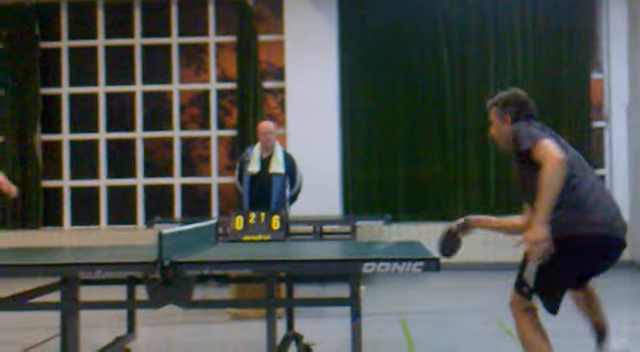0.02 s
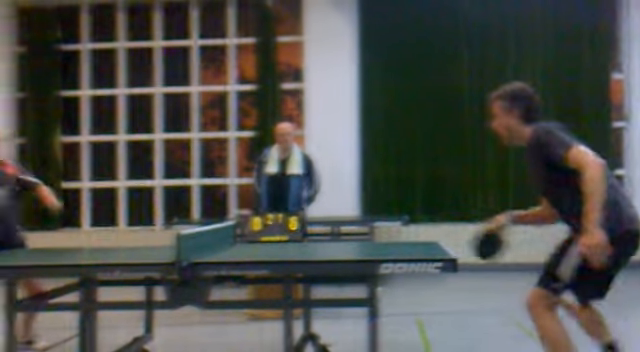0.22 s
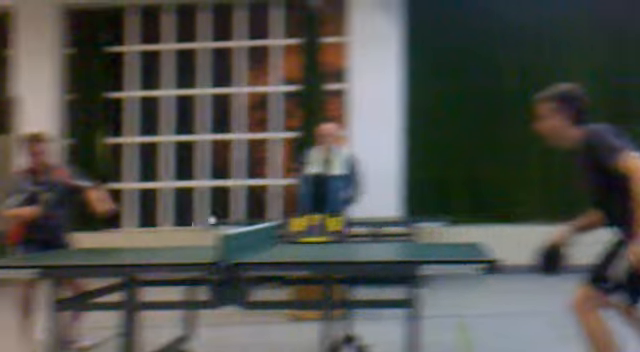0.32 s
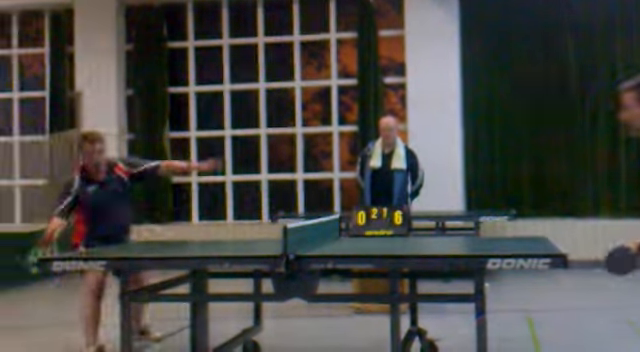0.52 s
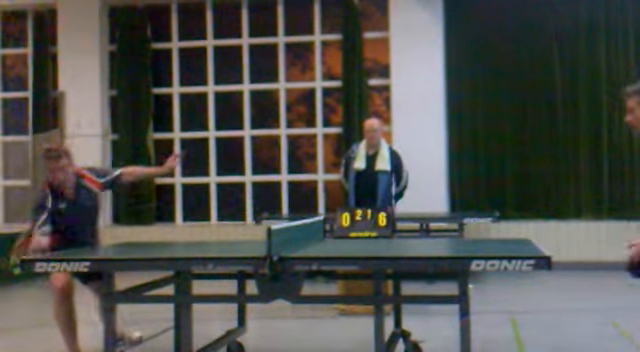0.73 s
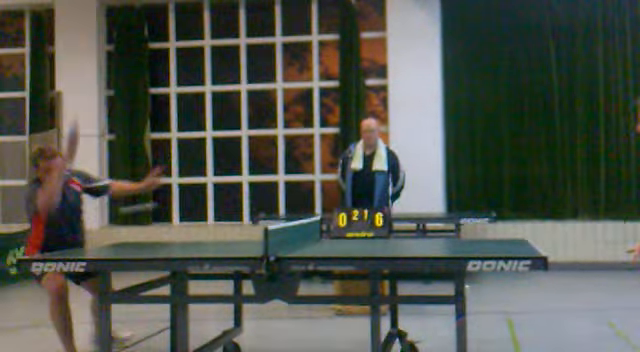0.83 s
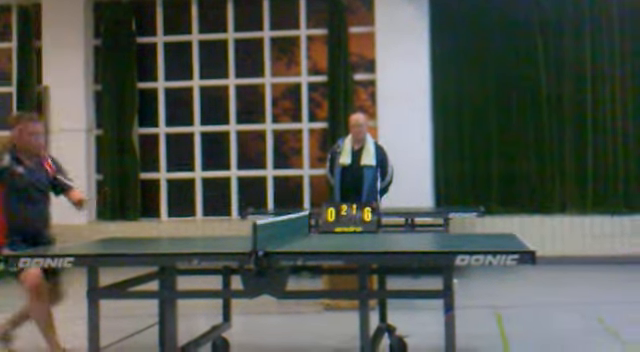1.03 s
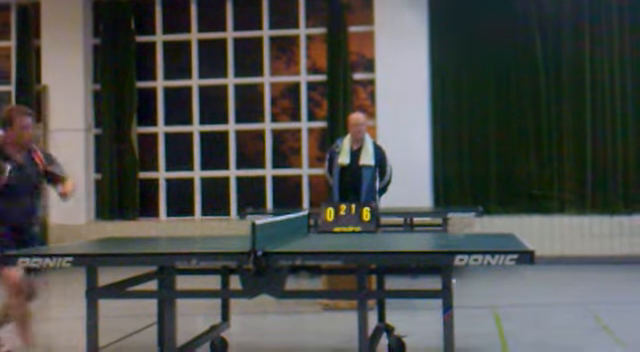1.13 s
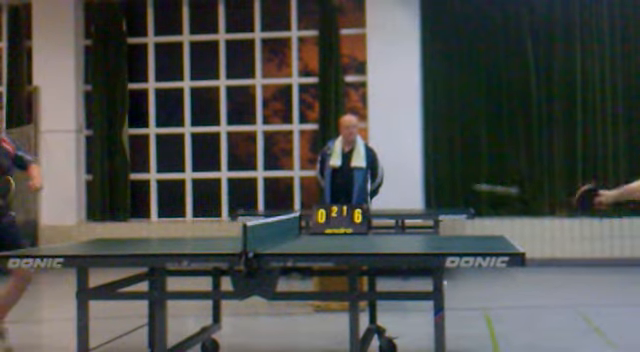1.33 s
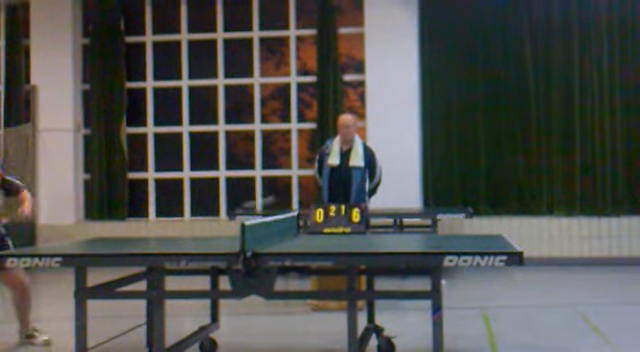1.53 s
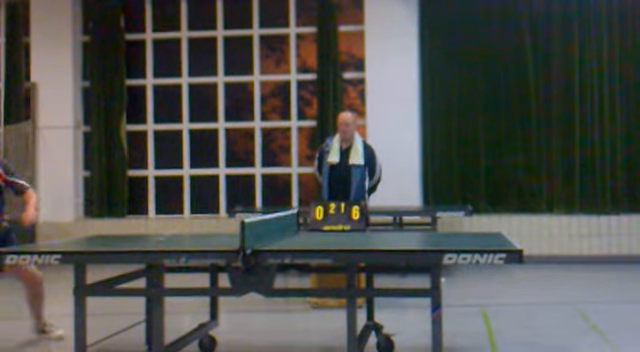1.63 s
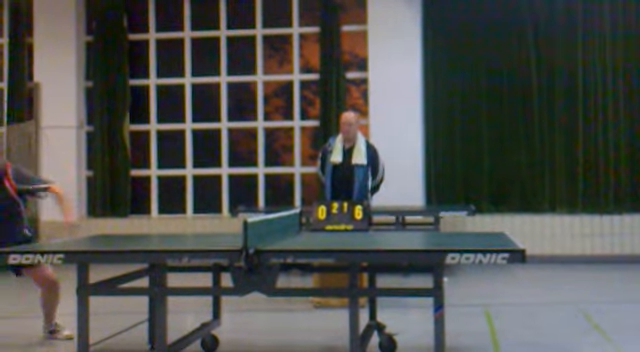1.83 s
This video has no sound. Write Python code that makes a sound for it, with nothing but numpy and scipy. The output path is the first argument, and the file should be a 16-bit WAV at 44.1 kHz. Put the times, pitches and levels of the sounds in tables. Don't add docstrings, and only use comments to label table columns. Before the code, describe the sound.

A massive foot stamp on sprung floorboards dominates at 0.24 s, deep and clipping the microphone, with a shoe squeak at 0.26. Just before, a dull bat knock at 0.08 and table click at 0.2. Softer table bounces follow at 0.6, 1.26 and 1.8, bat hits at 0.9 and 1.42, a higher squeak at 1.5, and quick footfalls from 1.4 onward. The hall rings over faint ventilation.

```python
import sys
import numpy as np
from scipy import signal
from scipy.fft import rfft, irfft, next_fast_len
from scipy.io import wavfile
from scipy.ndimage import map_coordinates

SR = 44100
rng = np.random.default_rng(int(sys.argv[2]) if len(sys.argv) > 2 else 0)


def output_pcm(signal):
    pcm = np.clip(np.atleast_2d(signal).T, -1, 1) * 32767
    wavfile.write(sys.argv[1], SR, np.round(pcm).astype(np.int16))


def field_ratio(decibels):
    return 10 ** (np.asarray(decibels, dtype=float) / 20)


N = 81585


def unit(x):
    return x / np.sqrt(np.mean(x ** 2) + 1e-20)


def along(points, hz):
    point_hz, value = np.transpose(points)
    return np.interp(np.log(hz + 1), np.log(point_hz + 1), value)


def wobble(rate, size):
    knots = rng.standard_normal(int(size * rate / SR) + 4)
    return map_coordinates(knots, [np.arange(size) * rate / SR])


def filtered(x, response):
    m = next_fast_len(len(x) + 8192)
    return irfft(rfft(x, m) * response(np.fft.rfftfreq(m, 1 / SR)), m)[:len(x)]


def resonant(x, peaks):
    def response(f):
        total = 0
        for k, (center, width, db) in enumerate(peaks):
            damping = 1j * f * width
            total = total + (-1) ** k * field_ratio(db) * damping / (center * center - f * f + damping)
        return total
    return filtered(x, response)


def add(track, s, x):
    at = round(s * SR)
    track[at:at + len(x)] += x[:N - at]


# pitch in Hz, time to fall by 60 dB in seconds.
HALL_RING = [(100, 0.77), (500, 0.75), (1500, 0.67), (3600, 0.59), (7000, 0.51), (12000, 0.31)]
HALL_LEVEL = {"ball": 2.5, "shell": -4, "bat": 0.5, "step": 0.5, "squeak": -2.5, "boom": -10}


def hall(x, source):
    gap_s, late_db, late_slower = 0.0071, -26, 2.56
    hz, t, noise = signal.stft(rng.standard_normal(SR), SR, nperseg=256)
    fall_db = -60 * t / along(HALL_RING, hz)[:, None]
    fade = np.hypot(field_ratio(fall_db), field_ratio(late_db + fall_db / late_slower))
    tail = signal.istft(noise * fade, SR, nperseg=256)[1]
    delayed = np.pad(x, (round(gap_s * SR), 0))
    out = field_ratio(HALL_LEVEL[source]) * signal.fftconvolve(delayed, tail / np.linalg.norm(tail))
    return out + np.pad(x, (0, len(out) - len(x)))


def tick(t60, peaks):
    t = np.arange(SR // 10) / SR
    burst = field_ratio(-60 * t / t60) * rng.standard_normal(len(t))
    x = resonant(resonant(burst, peaks), peaks)
    return x / np.linalg.norm(x) * np.sqrt(SR / 2000)


# start in seconds, boom level in dB, slap level in dB, pitch factor.
LANDINGS = [(.229, -11, -14.5, 1.5), (.243, 0, -27.5, .97), (0.091, -53, -70, 0.65),
            (0.631, -28.5, -38.5, 1), (0.798, -36, -74, 0.68), (.925, -40.5, -52, 1.4),
            (1.041, -40, -84, 0.66), (1.15, -37, -47, 0.934), (1.216, -25.5, -77, 0.457),
            (1.427, -33, -31.5, 1.2), (1.447, -21, -41, 1), (1.546, -25.5, -31.5, 0.84),
            (1.618, -28, -38, 0.71), (1.69, -28, -44.5, 0.92), (1.718, -34.5, -70, 0.486),
            (1.801, -30.5, -39.5, 0.67)]
# pitch in Hz, level in dB, time to fall by 60 dB in seconds.
FLOORBOARDS = [(50, -6, 0.23), (77.64, -10.5, 0.46), (110, -19.5, 0.47), (139.7, -13.5, 0.17),
               (166.4, -9, 0.4), (244, -26, 0.067), (279.6, -1, 0.05), (350, -24.5, 0.16)]
# pitch in Hz, level in dB per Hz.
SOLE_SLAP = [(150, -7), (350, 0), (650, -6.5), (1500, -9), (2500, -11), (3500, -13.5), (7000, -22.5),
             (15000, -50)]


def landings():
    heave_start_hz, heave_end_hz, heave_sag_s = 172.8, 83.56, 0.0299
    heave_t60_s, heave_rise_s = 0.33, 0.0038
    boom_rise_s, slap_t60_s = 0.0021, 0.068
    out, t = np.zeros(N), np.arange(SR // 2) / SR
    for s, boom_db, slap_db, pitch in LANDINGS:
        boards = 0
        for hz, db, t60 in FLOORBOARDS:
            boards = boards + field_ratio(db - 60 * t / t60) * np.sin(2 * np.pi * hz * pitch * t)
        sag = (heave_start_hz - heave_end_hz) * heave_sag_s * (1 - np.exp(-t / heave_sag_s))
        cycles = pitch * (heave_end_hz * t + sag)
        heave = field_ratio(-60 * t / heave_t60_s) * np.sin(2 * np.pi * cycles)
        heave = heave * (1 - np.exp(-t / heave_rise_s))
        boom = boards * (1 - np.exp(-t / boom_rise_s)) - heave
        boom = boom * np.cos(np.pi * t)
        slap = unit(filtered(rng.standard_normal(len(t)), lambda hz: field_ratio(along(SOLE_SLAP, hz))))
        slap = slap * field_ratio(-60 * t / slap_t60_s)
        add(out, s, hall(field_ratio(boom_db) * boom, "boom") + hall(field_ratio(slap_db) * slap, "step"))
    return out


# start in seconds, length in seconds, level in dB, slip rate in Hz, wander in Hz.
SQUEAK_TIMES = [
    (0.263, 0.0732, -12, 3597, 110),
    (1.498, 0.0648, -16, 4540, 63.4),
]
# level in dB at the start, middle and end.
SQUEAK_SWELL = [(5, 2.5, 0), (-16.5, 0, 1)]
# levels in dB of overtones 2, 3 and 4.
FIRST_OVERTONES = (-20.5, -30, -39)
# levels in dB of overtones 2, 3 and 4.
SECOND_OVERTONES = (-30, -50, -60)
# pitch in Hz, level in dB.
HIGH_RIB = [(6000, -22.5), (5930, -13)]
# wander knots a second, rasp level in dB, rasp width in Hz, rib split in Hz.
SQUEAK_ROUGHNESS = [(450, -12, 950, 130), (350, -19, 1500, 225)]


def squeaks():
    chirp, chirp_s = 0.06, 0.0036
    mixing = field_ratio(-32)
    out, t = np.zeros(N), np.arange(SR // 8) / SR
    overtones = (FIRST_OVERTONES, SECOND_OVERTONES)
    rows = zip(SQUEAK_TIMES, SQUEAK_SWELL, overtones, HIGH_RIB, SQUEAK_ROUGHNESS)
    for times, swell_db, over_db, (high_hz, high_db), roughness in rows:
        s, length, db, hz, wander_hz = times
        knots, rasp_db, rasp_hz, split_hz = roughness
        high_turn = 2 * np.pi * np.cumsum(high_hz + 90 * wobble(250, len(t))) / SR
        high = np.sin(high_turn) + mixing * np.sin(2 * high_turn)
        rasp_peak = [(hz, rasp_hz, 0)]
        rasp = unit(resonant(resonant(rng.standard_normal(len(t)), rasp_peak), rasp_peak))
        tone = field_ratio(rasp_db) * rasp
        for side in (-.5, .5):
            rate = (hz + side * split_hz) * (1 + chirp * np.exp(-t / chirp_s))
            rate = rate + wander_hz * wobble(knots, len(t))
            turn = 2 * np.pi * np.cumsum(rate) / SR
            tone = tone + np.sin(turn)
            for k, overtone_db in enumerate(over_db):
                tone = tone + field_ratio(overtone_db) * np.sin((k + 2) * turn)
            high = high + mixing * np.sin(turn + high_turn)
        edge = np.clip(t / 0.0061, 0, 1) * np.clip((length - t) / .006 + 1, 0, 1)
        swell = np.interp(t, [0, length / 2, length], swell_db)
        grip = field_ratio(swell + 3.4 * wobble(128, len(t)))
        high_grip = field_ratio(high_db + 1.5 * wobble(120, len(t)))
        add(out, s, field_ratio(db) * hall(edge * (grip * tone + high_grip * high), "squeak"))
    return out


# start in seconds, level in dB, pitch in Hz.
SOLE_SCUFFS = [(.740, -45, 4840), (.88, -46, 4496), (.92, -53.5, 5870), (.935, -30, 361),
               (.945, -40.5, 800), (1.011, -45, 2240), (1.025, -57.5, 8000), (1.150, -43.5, 5000),
               (1.309, -31, 1850), (0.068, -47, 5020), (1.431, -37, 9400), (1.46, -32.5, 4800)]


def scuffs():
    out = np.zeros(N)
    for s, db, hz in SOLE_SCUFFS:
        add(out, s, field_ratio(db) * hall(tick(0.0094, [(hz, 0.48 * hz, 0)]), "step"))
    return out


# delay in seconds, level in dB.
NEAR_ECHOES = [(.0097, 1), (.018, -8), (.0315, -4), (.050, -9)]


def echoed(t60, peaks):
    out = np.zeros(SR // 5)
    for s, db in [(0.0039, -1.5)] + NEAR_ECHOES:
        add(out, s, field_ratio(db) * tick(t60, peaks))
    return out


# start in seconds, level in dB, shell brightness in dB.
TABLE_BOUNCES = [
    (0.198, -28.5, -11),
    (.6130, -32, -10),
    (.9020, -49.5, -5.5),
    (1.2583, -29, -3),
    (1.7984, -27, -13),
]
# pitch in Hz, width in Hz, level in dB.
TABLE_TOP = [(800, 1500, -5), (1395, 1300, 2), (1920, 580, -0.5), (3580, 610, -12)]
# pitch in Hz, width in Hz, level in dB.
BALL_SHELL = [(4260, 430, 2), (5700, 660, -0.5), (7190, 1100, -4.5), (8840, 200, 5), (10300, 1130, -1.5),
              (12850, 1300, -2.5)]


def table_bounces():
    top_lag_s = .005
    out = np.zeros(N)
    for s, db, shell_db in TABLE_BOUNCES:
        add(out, s, field_ratio(db + shell_db) * hall(echoed(0.0053, BALL_SHELL), "shell"))
        add(out, s + top_lag_s, field_ratio(db) * hall(echoed(0.0069, TABLE_TOP), "ball"))
    return out


# start in seconds, level in dB, blade pitch in Hz, shell in dB.
BAT_STROKES = [
    (.067, -49, 1140, -11),
    (0.084, -32, 946, -28),
    (.905, -41, 787, -10.5),
    (1.416, -26, 935, -18),
]


def bat_strokes():
    out = np.zeros(N)
    for s, db, hz, shell_db in BAT_STROKES:
        blade = tick(.006, [(hz, 200, 0), (1.39 * hz, 500, -6)])
        shell = tick(0.0065, BALL_SHELL[::3])
        add(out, s, field_ratio(db) * hall(blade + field_ratio(shell_db) * shell, "bat"))
    return out


# pitch in Hz, level in dB per Hz.
ROOM_AIR = [(20, -32.5), (45, -12.5), (110, 4), (200, -6), (500, -13.5), (1000, -15.5), (4500, -27),
            (16000, -36)]


def air():
    level_db, swing_db = -55.5, 1
    noise = unit(filtered(rng.standard_normal(N), lambda hz: field_ratio(along(ROOM_AIR, hz))))
    return field_ratio(level_db + swing_db * wobble(24, N)) * noise


def scene():
    ball = table_bounces() + bat_strokes()
    feet = landings() + scuffs() + squeaks()
    return (feet + ball + air())[None]


def roll_off(x):
    return signal.sosfilt(signal.butter(12, 16480, fs=SR, output="sos"), x)


def record(dry):
    mic_low_hz, clip_top, clip_hard = 37, .725, 24
    x = filtered(dry[0], lambda hz: (1j * hz / (mic_low_hz + 1j * hz)) ** 2)[None]
    x = x / (1 + np.abs(x / clip_top) ** clip_hard) ** (1 / clip_hard)
    return roll_off(x)


dry = scene()
out = record(dry)
output_pcm(out)
```